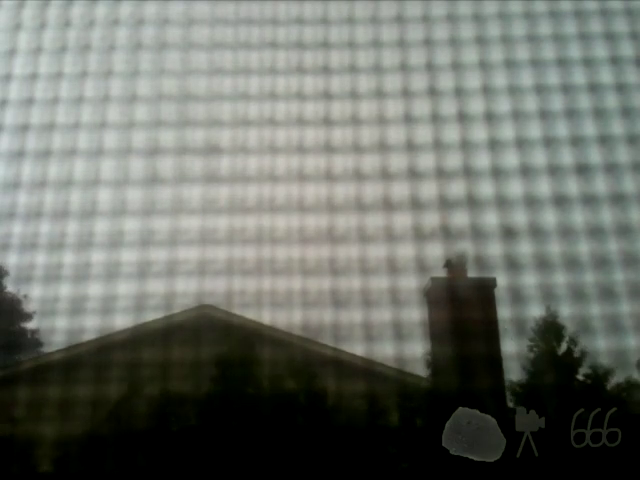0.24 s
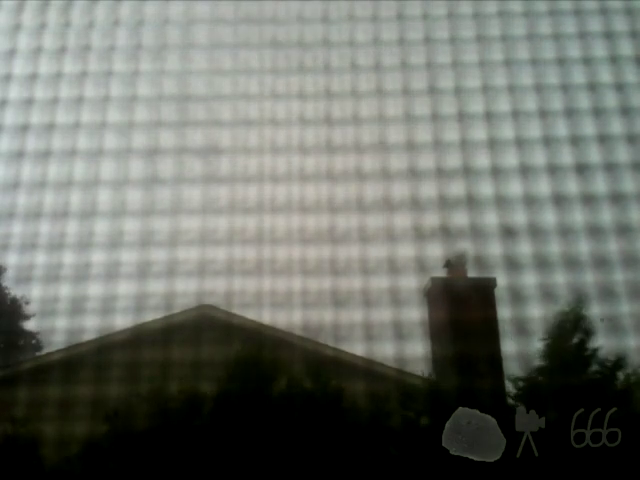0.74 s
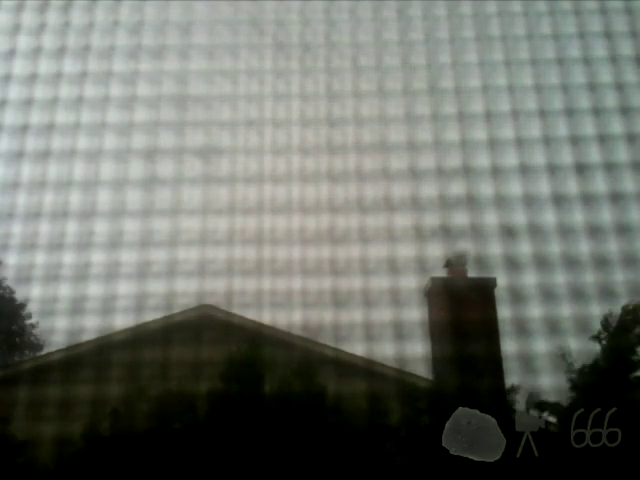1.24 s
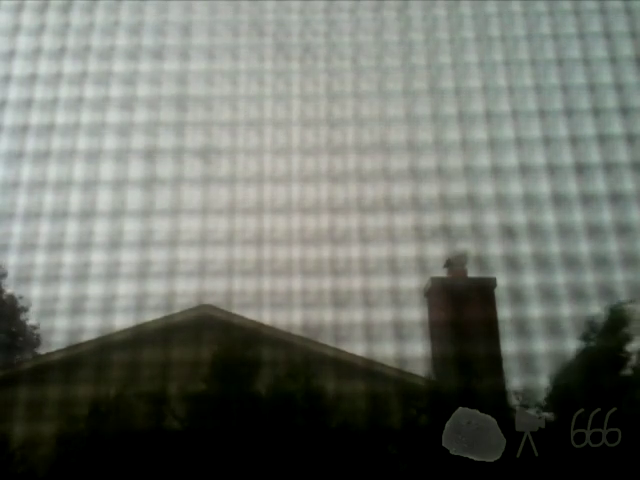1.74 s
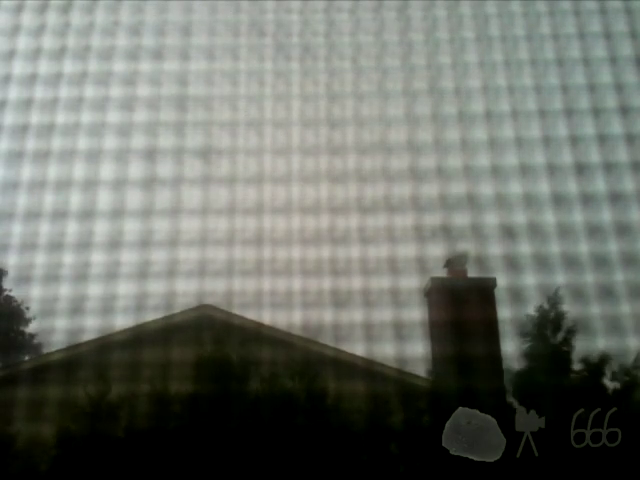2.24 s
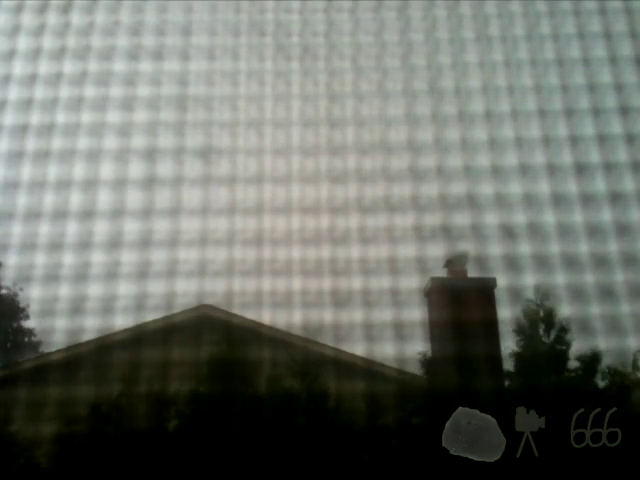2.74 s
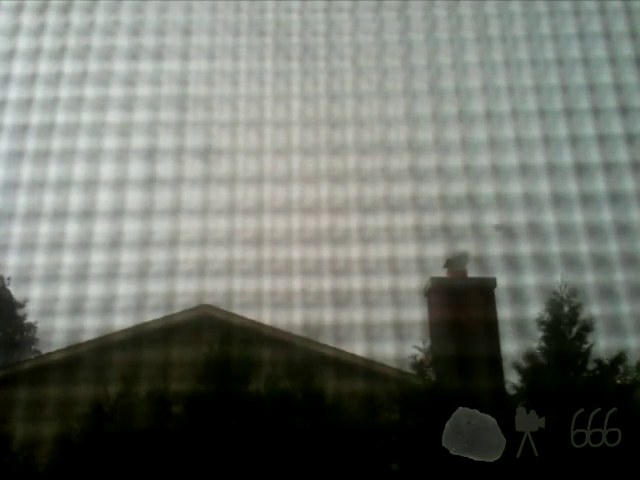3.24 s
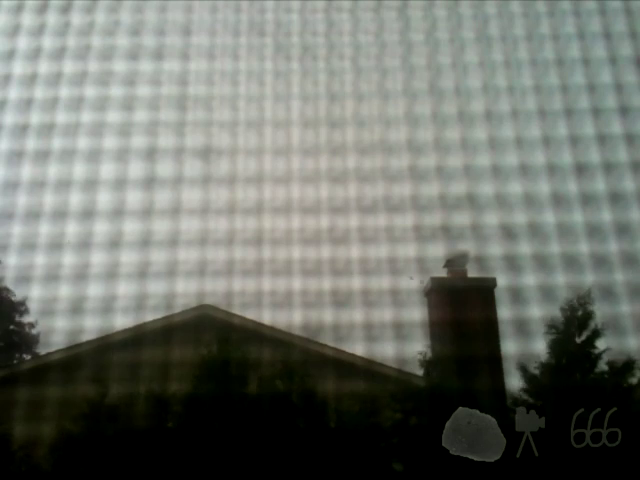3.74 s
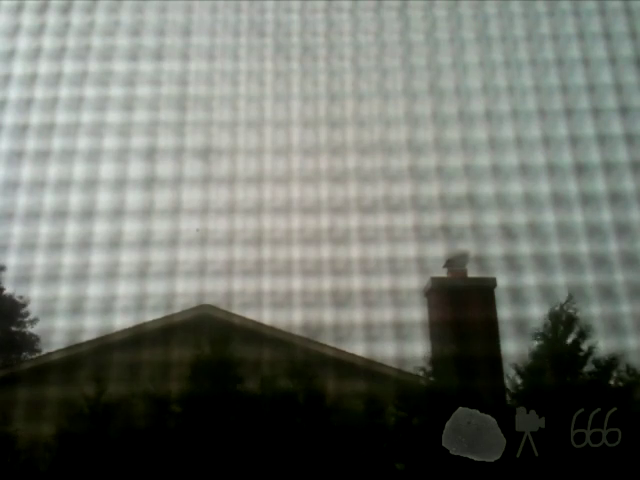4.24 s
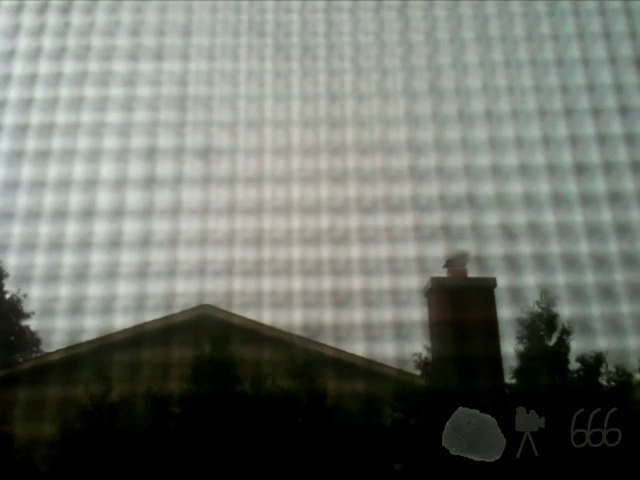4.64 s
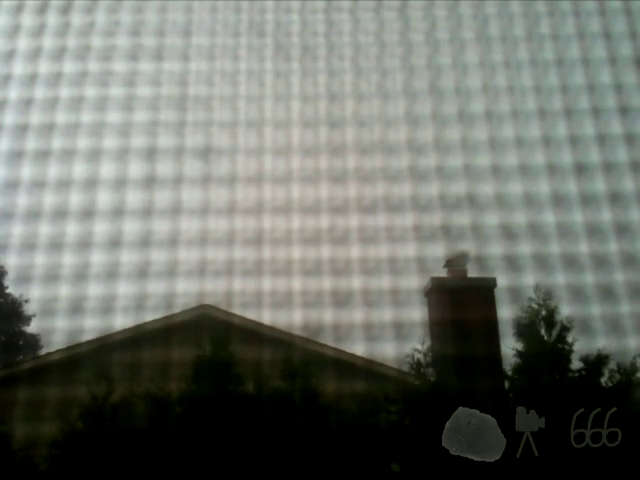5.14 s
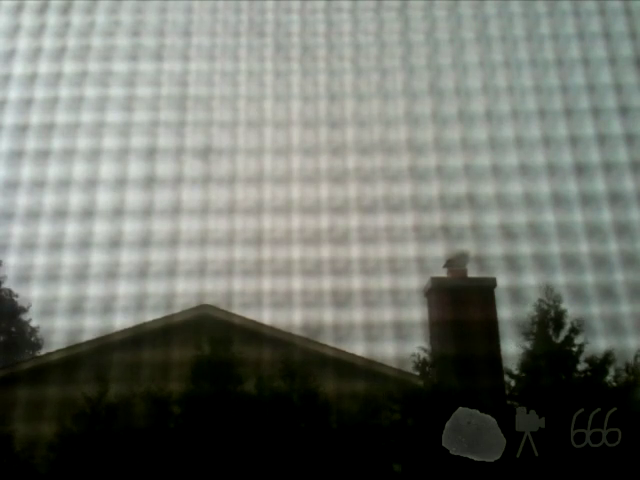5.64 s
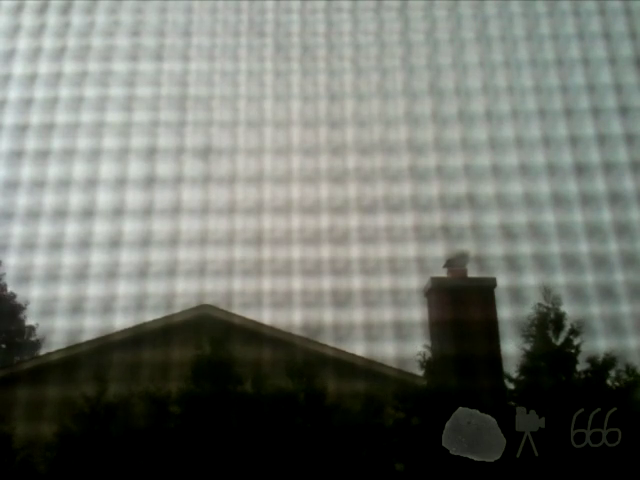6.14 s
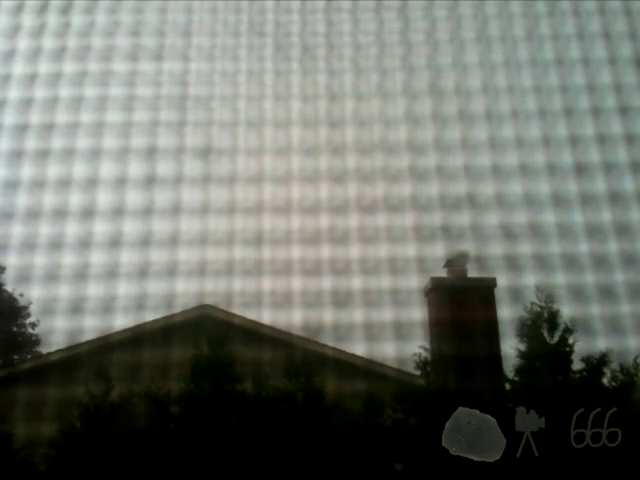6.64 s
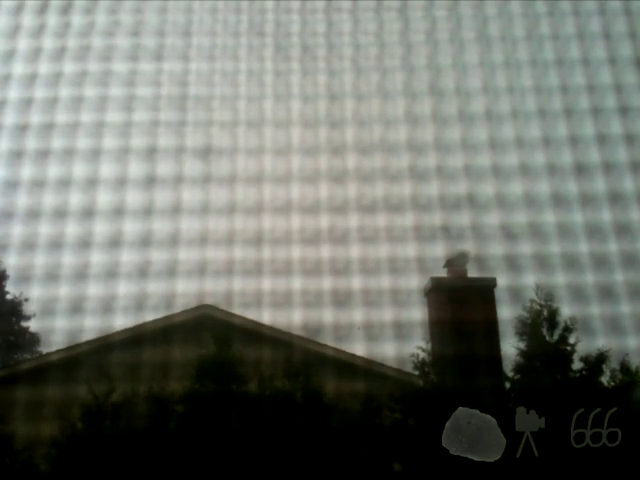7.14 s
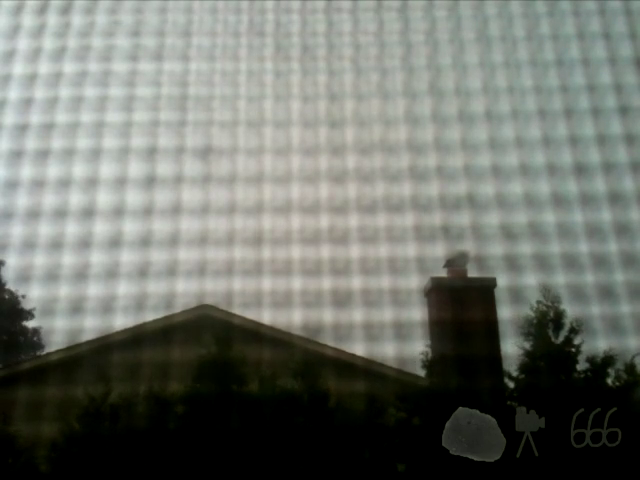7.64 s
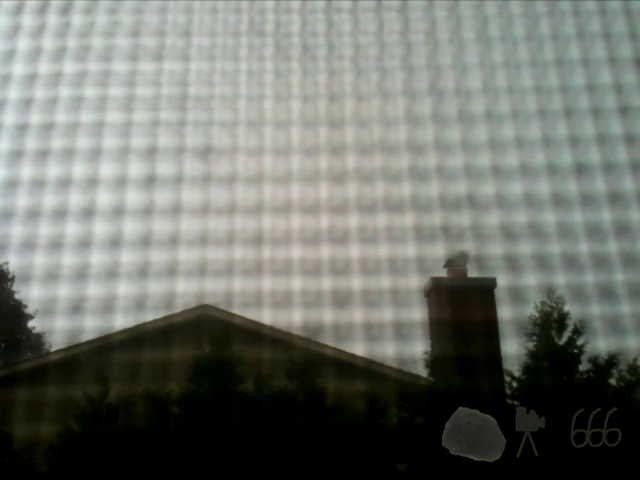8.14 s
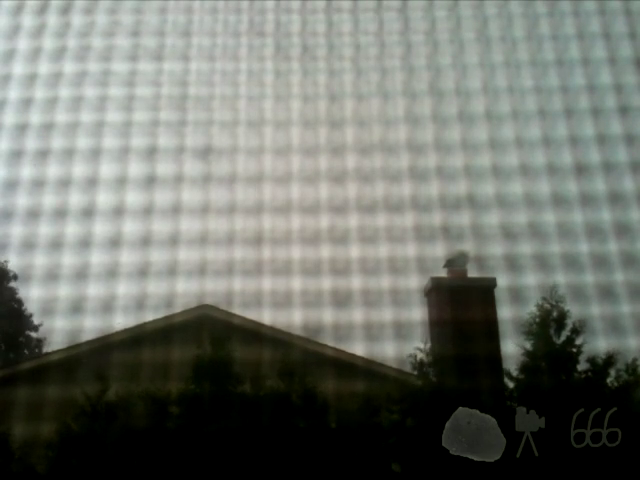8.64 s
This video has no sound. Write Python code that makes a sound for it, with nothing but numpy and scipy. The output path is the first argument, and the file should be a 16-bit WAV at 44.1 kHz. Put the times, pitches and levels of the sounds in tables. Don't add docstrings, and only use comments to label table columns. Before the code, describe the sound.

Through a screened window, rain hisses over roofs and leaves; early drops tick the mesh, and halfway through, far thunder rumbles, fades and mutters on.

```python
import sys
import numpy as np
from scipy import signal
from scipy.fft import rfft, irfft, next_fast_len
from scipy.io import wavfile
from scipy.ndimage import uniform_filter1d, map_coordinates

SR = 44100
rng = np.random.default_rng(int(sys.argv[2]) if len(sys.argv) > 2 else 0)


def wav_record(signal):
    frames = np.transpose(np.atleast_2d(signal))
    bounded = np.clip(frames, -1, 1)
    quanta = np.round(bounded * 32767).astype(np.int16)
    wavfile.write(sys.argv[1], SR, quanta)


def volts_from_decibels(level):
    exponent = np.asarray(level, float) / 20
    return 10 ** exponent


N = 392931

# [t/s, boom level/dB, hold/s, crackle re boom/dB, depth re boom/dB]
PEALS = [(4.49, -33, 0.014, 1.5, -22), (4.60, -36.5, 0.043, 4, -16), (4.66, -30, 0.092, -0.5, -25),
         (4.806, -31, .06, -4.5, -22), (4.89, -24, 0.12, -1.5, -22), (5.053, -28, 0.082, -3, -23),
         (5.18, -38, .2, -9, -17), (5.45, -38, .08, -11, -21), (5.62, -39, 0.19, -3, -14),
         (5.838, -37.5, 0.045, 3, -20), (6.40, -32.5, 0.034, -7, -22), (6.59, -32.5, 0.062, -3, -18),
         (6.742, -33, 0.033, -3.5, -18), (7.06, -41.5, 0.037, -1, -18), (7.514, -38, 0.055, -8, -18),
         (7.715, -35, .03, -9, -20), (7.78, -32, .02, -6, -18), (7.823, -34.5, .02, -8, -4),
         (7.878, -38, .01, -8, -20), (8.03, -36, .015, -5, -20), (8.223, -38, 0.037, -12, -18),
         (8.49, -42, .02, -14, -6)]
# [f/Hz, density level/dB]
BOOM_SPECTRUM = [(76, -37.5), (130, -2.5), (221, 0), (361, -9), (400, -6.5), (520, -38), (880, -120)]
# [f/Hz, density level/dB]
CRACKLE_SPECTRUM = [(180, -39.5), (300, -2), (528, -5), (939, -15), (1140, -29), (1300, -32), (1690, -30),
                    (2860, -120)]
# [f/Hz, density level/dB]
DEPTH_SPECTRUM = [(18, -61), (30, -31), (54, -27), (79, -9), (99, -2), (125, 3), (160, -28), (310, -120)]
# [t/s, peak level/dB, ring f/Hz, high ring re ring/dB, 60 dB decay/s]
SCREEN_DROPS = [
    (.524, -20, 6100, -1, .005),
    (1.1185, -22, 6750, -40, .017),
    (8.672, -30, 6700, -30, .014),
]
# [t/s, spray level/dB]
RAIN_DRIVE = [(0, -45), (.6, -44.8), (1.3, -45.8), (2.2, -45.5), (2.8, -46.3), (4.1, -46), (4.7, -44.7),
              (5.2, -45.6), (5.65, -47.2), (6.5, -47), (7.3, -46.3), (7.95, -44.3), (8.5, -44),
              (8.91, -44.4)]
# [f/Hz, density level/dB]
SPRAY_SPECTRUM = [(3820, -30.5), (6500, 0), (7360, 0.5), (7830, -3), (9160, -3.5), (9910, -8), (13600, -14),
                  (14200, -12.5)]
# [f/Hz, density level/dB]
ROOF_SPECTRUM = [(1300, -41), (2100, -13.5), (2480, -1.5), (2740, -3), (2980, 1), (3250, -0.5), (3430, 0.4),
                 (4040, -3.5), (4330, -6), (4720, -5), (5950, -11), (6700, -11), (7500, -17.5), (9750, -36),
                 (16500, -120)]
# [f/Hz, density level/dB]
TREE_SPECTRUM = [(18, -75), (30, -38), (69, -29.5), (91, -14), (199, -1.5), (286, -4), (398, -3),
                 (604, -2.5), (949, -0.5), (1070, -3), (1440, -2.5), (1900, -12.5), (2470, -38),
                 (4180, -120)]
# [f/Hz, level/dB]
HOLE_THRESHOLD = [(1000, -9), (4000, -8), (9000, -8), (11000, -3.5), (14000, -3)]
# [t/s, low f/Hz, high f/Hz, difference level/dB]
CHANNEL_SLIPS = [
    (1.70, 5200, 9000, -3),
    (4.09, 5200, 7700, -1),
    (5.0, 5200, 7000, -1),
    (6.46, 4700, 10400, -2),
    (7.53, 4160, 5200, -2),
    (8.155, 6200, 7800, -3),
    (8.155, 10200, 11800, 1),
]
FRAME_START = 188


def unit(x):
    return x / np.sqrt(np.mean(x ** 2) + 1e-20)


def wobble(rate_hz):
    knots = rng.standard_normal(N // 500)
    return map_coordinates(knots, [np.arange(N) * rate_hz / SR])


def coloured(x, spectrum):
    size = next_fast_len(N + 8192)
    f, db = np.transpose(spectrum)
    hz = np.fft.rfftfreq(size, 1 / SR)
    gain = volts_from_decibels(np.interp(np.log(hz + 1), np.log(f + 1), db))
    cepstrum = irfft(np.log(gain + 1e-5), size)
    cepstrum[1:size // 2] *= 2
    cepstrum[size // 2 + 1:] = 0
    response = np.exp(rfft(cepstrum))
    return unit(irfft(rfft(x, size) * response, size)[:N])


def patchy(depth_db):
    z = signal.stft(rng.standard_normal(N), nperseg=512)[2]
    field = uniform_filter1d(rng.standard_normal(z.shape), size=6, axis=0)
    field = uniform_filter1d(field, size=12, axis=1)
    return unit(signal.istft(z * volts_from_decibels(depth_db * unit(field)), nperseg=512)[1][:N])


def impacts(count, spread_db):
    when, sign = rng.random((count, 2)).T
    size = volts_from_decibels(spread_db * rng.standard_normal(count))
    return unit(np.bincount((when * N).astype(int), np.sign(sign - .5) * size, N))


def peal_gains():
    t = np.arange(N) / SR
    since = t - PEALS[0][0]
    swell_s, fade_s = 0.027, 0.067
    mutter_db = -40.5 - 1.2 * since + [[0], [-6], [-17.5]]
    power = (since > 0) * volts_from_decibels(mutter_db) ** 2
    for s, db, hold_s, crackle_db, depth_db in PEALS:
        rise = np.minimum(0, (t - s) / swell_s)
        fall = np.maximum(0, (t - s - hold_s) / fade_s)
        levels = volts_from_decibels([[db], [db + crackle_db], [db + depth_db]])
        power = power + (levels * np.exp(rise - fall)) ** 2
    return np.sqrt(power)


def jumbled_shocks():
    return volts_from_decibels(-5.5) * impacts(count=9000, spread_db=3.0) + patchy(depth_db=1.1)


def thunder():
    boom, crackle, depth = peal_gains()
    parts = boom * coloured(jumbled_shocks(), BOOM_SPECTRUM)
    parts += crackle * coloured(jumbled_shocks(), CRACKLE_SPECTRUM)
    parts += depth * coloured(jumbled_shocks(), DEPTH_SPECTRUM)
    return volts_from_decibels(1.3 * wobble(25)) * parts


def screen():
    out = np.zeros(N + SR)
    t = np.arange(SR // 20) / SR
    for s, db, hz, high_db, t60 in SCREEN_DROPS:
        ring = np.sin(2 * np.pi * hz * t) + 0.57 * np.sin(2 * np.pi * 1.19 * hz * t)
        high = np.sin(2 * np.pi * 12700 * t) * np.cos(2 * np.pi * 600 * t)
        ring += volts_from_decibels(high_db) * high
        decay = volts_from_decibels(db - 1.5 - 60 * t / t60)
        onset = 1 - np.exp(-t / .0003)
        out[round(s * SR):][:len(t)] += decay * onset * ring
    return out[:N]


def near_spray():
    grains = volts_from_decibels(-7.0) * impacts(count=15000, spread_db=1)
    return coloured(patchy(depth_db=0.65) + grains, SPRAY_SPECTRUM)


def roof_rain():
    grains = volts_from_decibels(-9.5) * impacts(count=30000, spread_db=2)
    return coloured(patchy(depth_db=0.74) + grains, ROOF_SPECTRUM)


def tree_wind():
    return coloured(patchy(depth_db=0.43), TREE_SPECTRUM)


def weather():
    s, db = np.transpose(RAIN_DRIVE)
    spray_db = np.interp(np.arange(N) / SR, s, db)
    mean_db = spray_db.mean()
    swing_db = spray_db - mean_db
    gust = wobble(3.63) + 0.38 * wobble(11)
    spray = volts_from_decibels(spray_db + 2.0 + 0.18 * gust) * near_spray()
    rain = volts_from_decibels(mean_db + 8.5 + 0.8 * swing_db + 0.37 * gust) * roof_rain()
    wind = volts_from_decibels(mean_db + 11.5 + 0.57 * swing_db + 0.11 * gust) * tree_wind()
    return spray + rain + wind


def mottled(x):
    hz, _, z = signal.stft(x, SR, window="cosine", nperseg=2048)
    power = uniform_filter1d(abs(z) ** 2, size=3, axis=0)
    f, db = np.transpose(HOLE_THRESHOLD)
    bar = np.median(power, axis=1) * volts_from_decibels(2 * np.interp(hz, f, db))
    keep = power ** 3 / (power ** 3 + bar[:, None] ** 3 + 1e-60)
    return signal.istft(z * keep, SR, window="cosine", nperseg=2048)[1][:N]


def top_band(x):
    top_hz, open_share, scatter_db = 13640, .14, 1.7
    top = irfft(rfft(x) * (np.fft.rfftfreq(N, 1 / SR) > top_hz), N)
    frame = (np.arange(N) + 1024 + 512 - FRAME_START) // 1024
    power = np.bincount(frame, uniform_filter1d(top ** 2, size=1024))
    power = power * volts_from_decibels(2 * scatter_db * rng.standard_normal(len(power)))
    power = power[frame]
    is_open = power > np.quantile(power, 1 - open_share)
    gate = uniform_filter1d(1. * is_open, size=700)
    return x - top + gate ** 2 * top


def channel_difference(x):
    hz, t, z = signal.stft(x[FRAME_START:], SR, nperseg=2048)
    band = (12 * np.log(1 + hz / 1500)).astype(int)
    luck = rng.random((band.max() + 1, len(t)))[band]
    level = volts_from_decibels(-19 + 9 * (hz[:, None] > 11000))
    gain = level * (luck < .014) * (hz[:, None] > 900)
    for s, low_hz, high_hz, db in CHANNEL_SLIPS:
        gain[(hz > low_hz) & (hz < high_hz), np.argmin(abs(t - s))] = volts_from_decibels(db)
    random_phase = np.exp(2j * np.pi * rng.random(z.shape))
    side = signal.istft(z * gain * random_phase, SR, nperseg=2048)[1]
    return np.pad(side, (FRAME_START, 0))[:N]


def scene():
    return np.tile(thunder() + screen() + weather(), (2, 1))


def top_cut(x):
    return signal.sosfilt(signal.butter(12, 14340, fs=SR, output="sos"), x)


def record(dry):
    mid = top_band(mottled(dry.mean(axis=0)))
    side = channel_difference(mid)
    return top_cut(np.array([mid + side, mid - side]))


dry = scene()
out = record(dry)
wav_record(out)
```